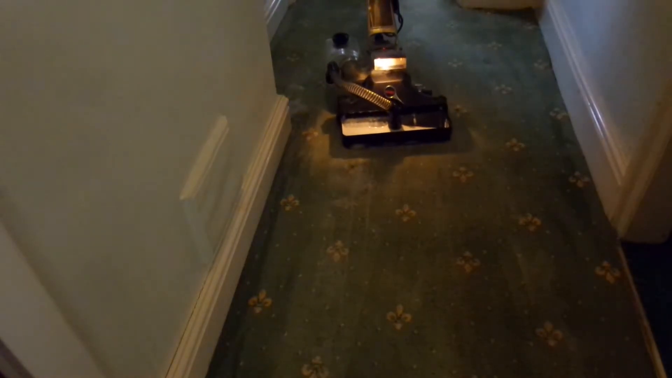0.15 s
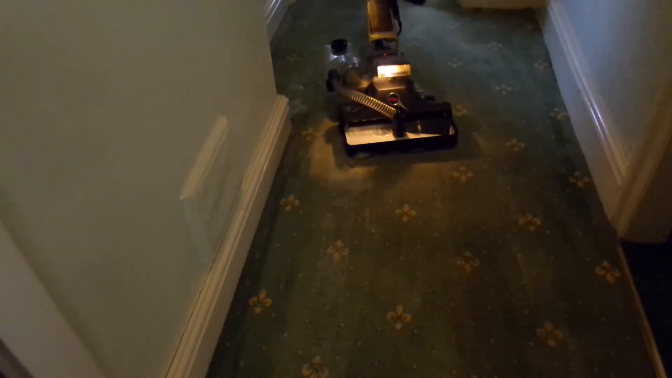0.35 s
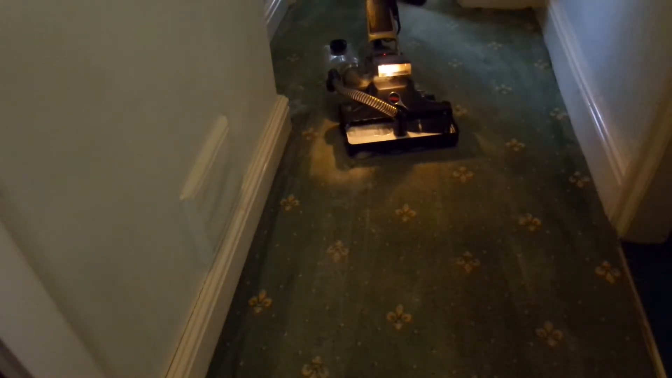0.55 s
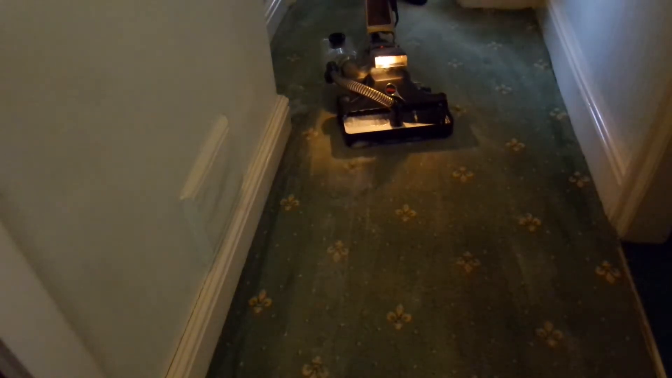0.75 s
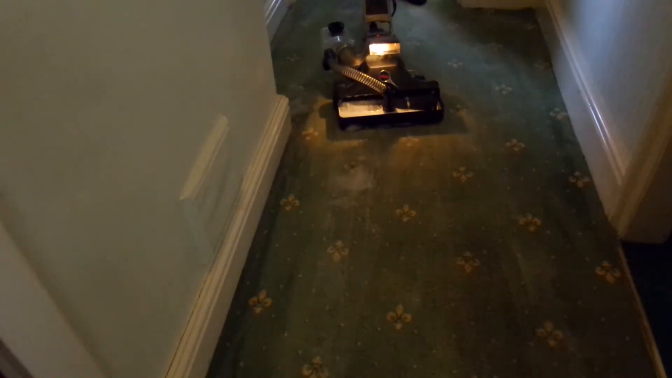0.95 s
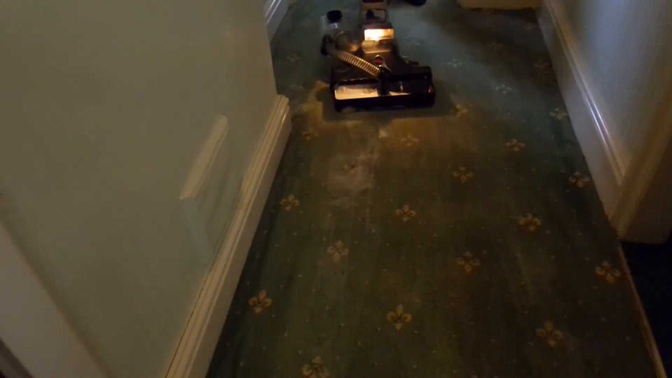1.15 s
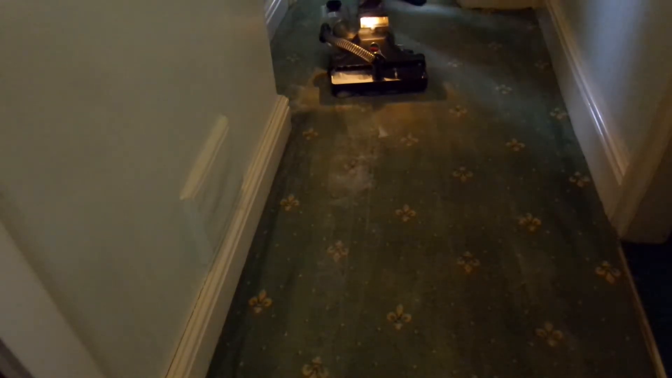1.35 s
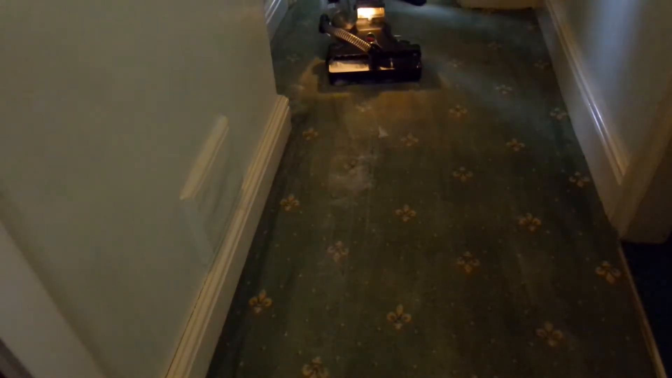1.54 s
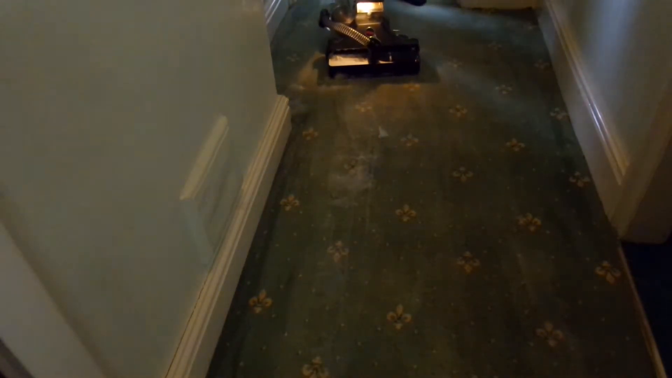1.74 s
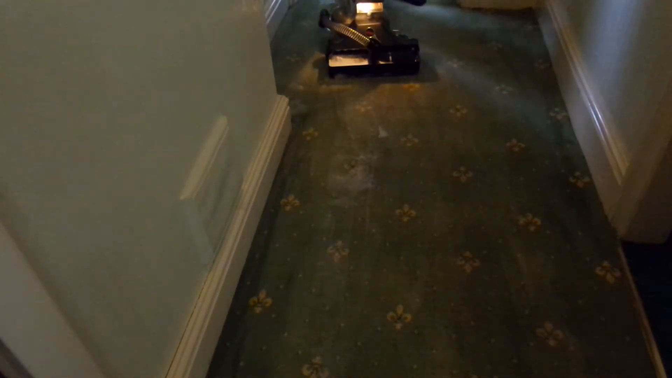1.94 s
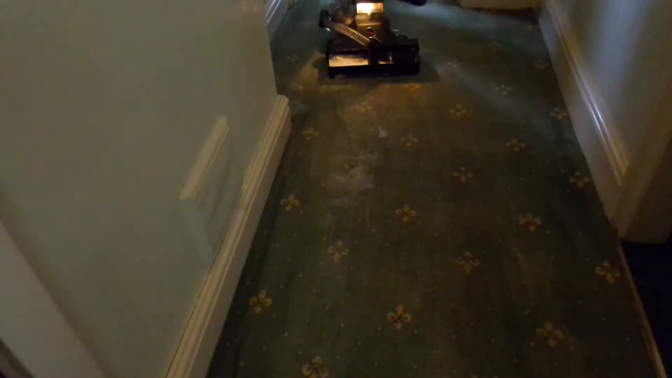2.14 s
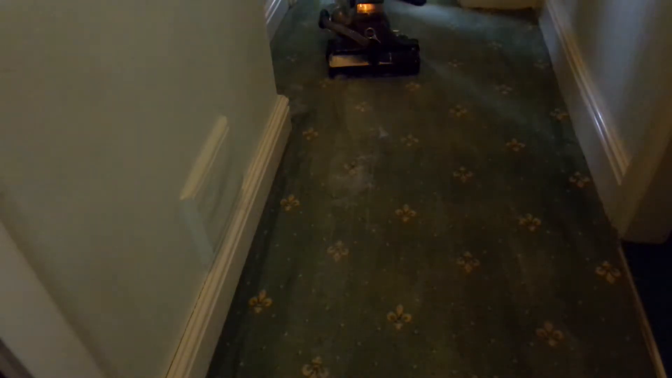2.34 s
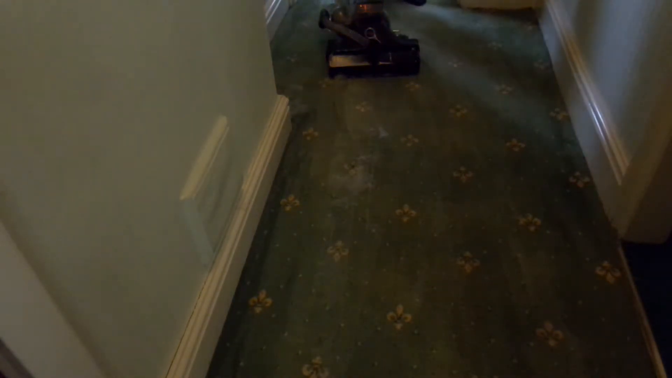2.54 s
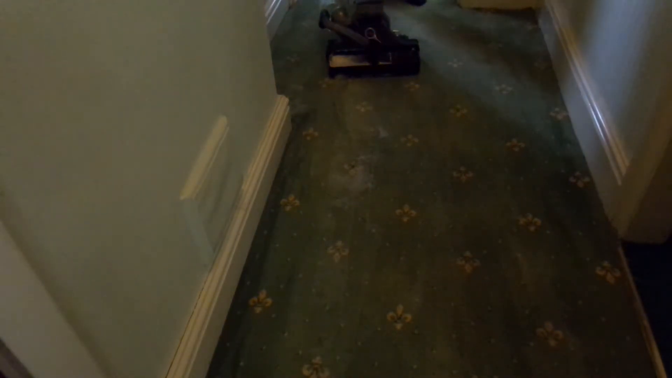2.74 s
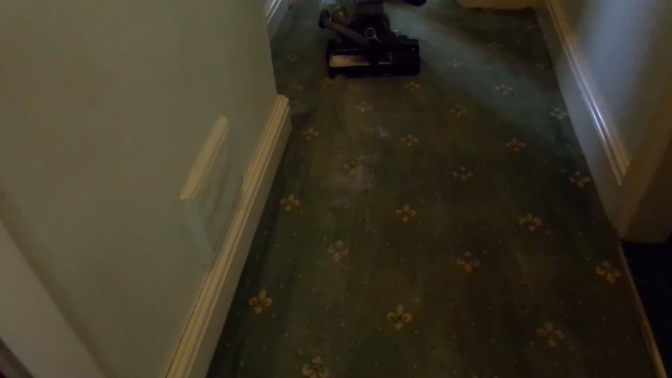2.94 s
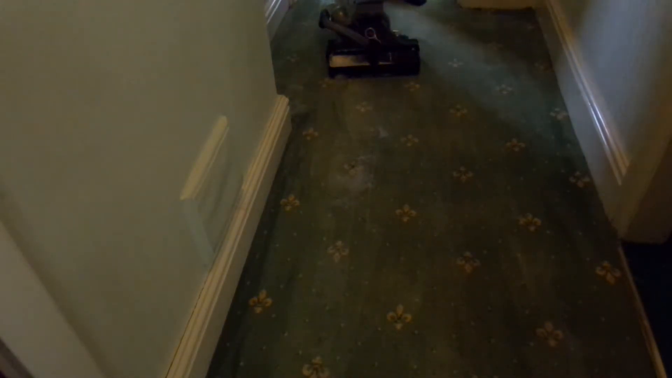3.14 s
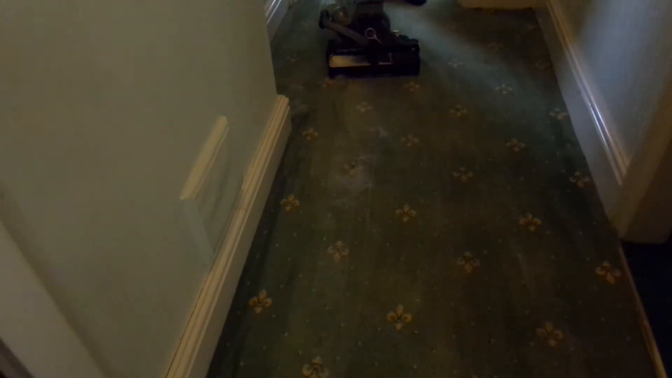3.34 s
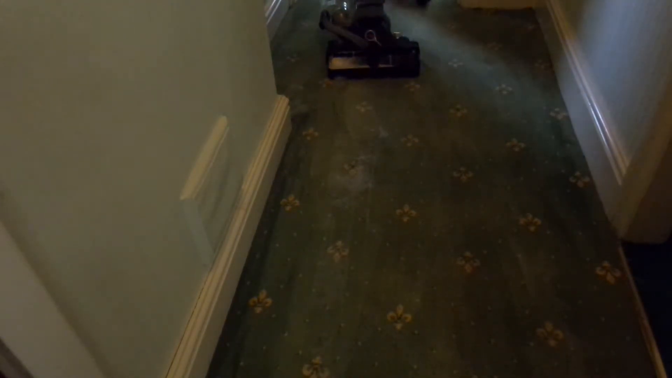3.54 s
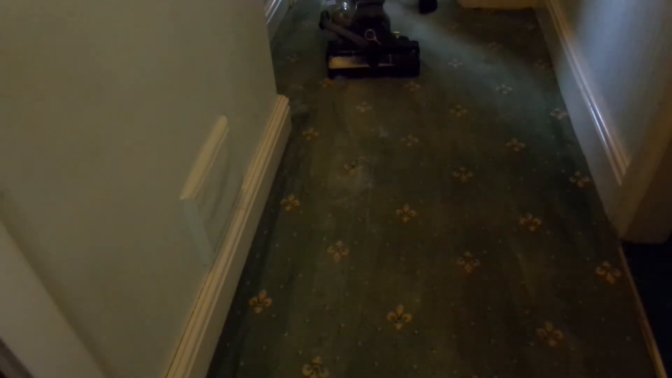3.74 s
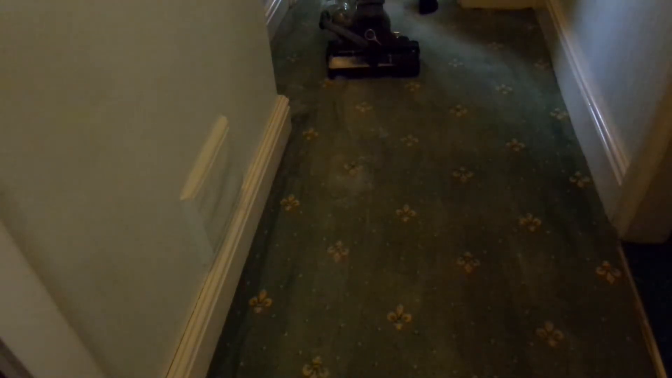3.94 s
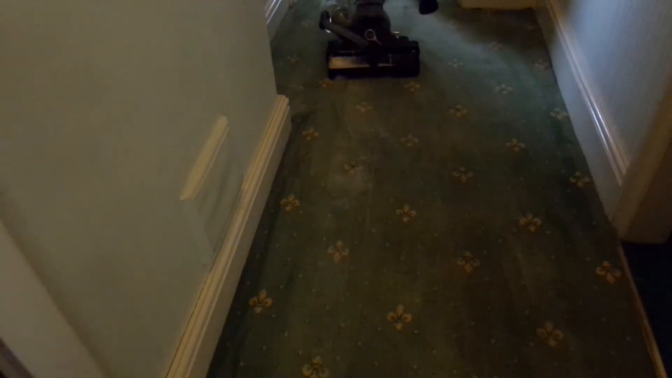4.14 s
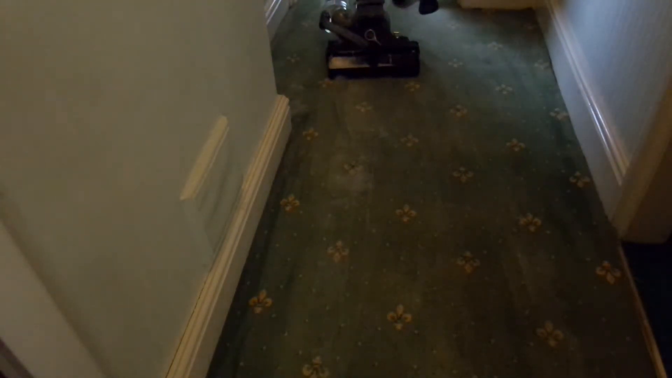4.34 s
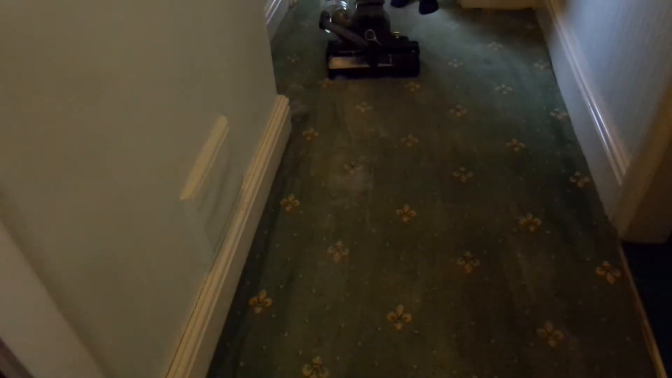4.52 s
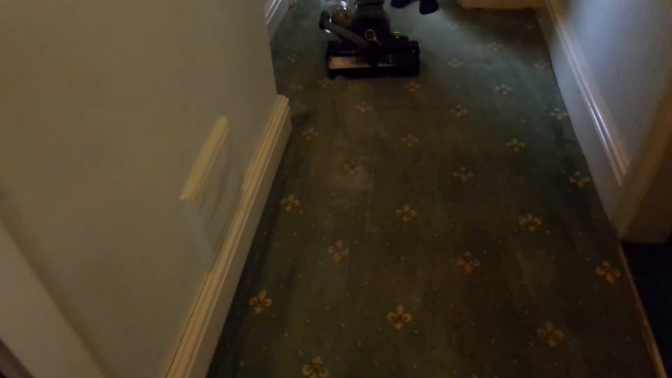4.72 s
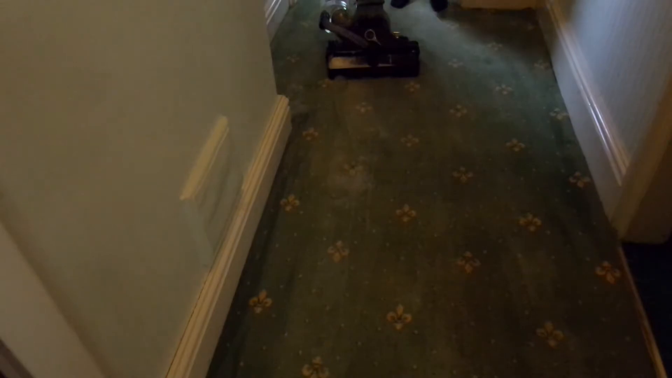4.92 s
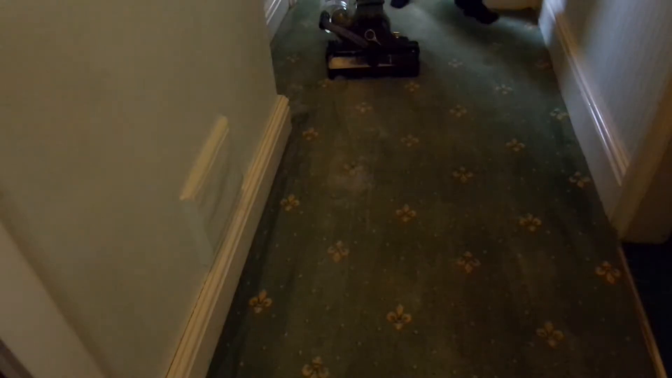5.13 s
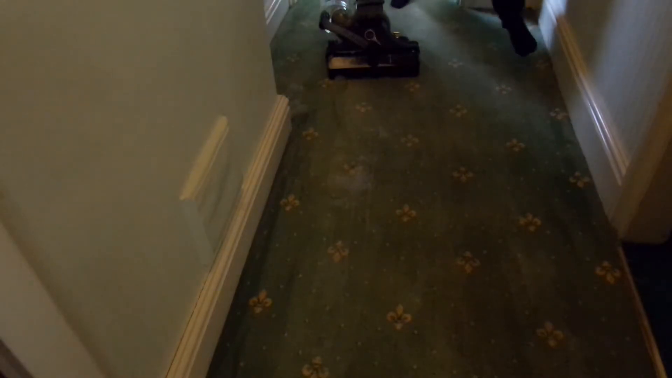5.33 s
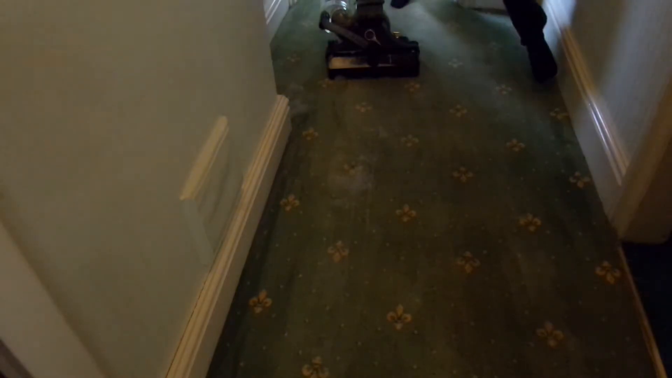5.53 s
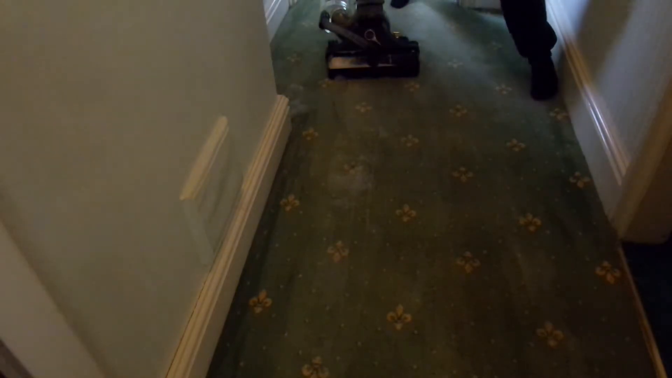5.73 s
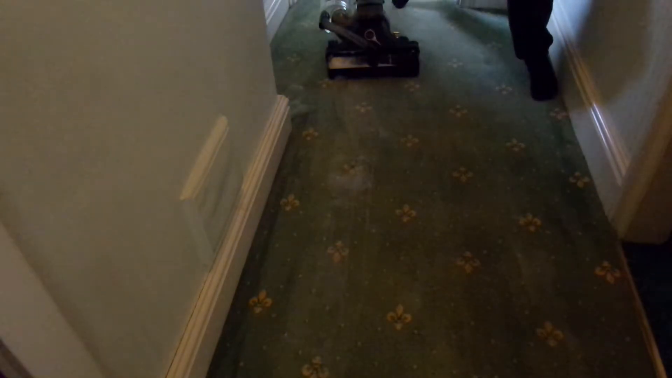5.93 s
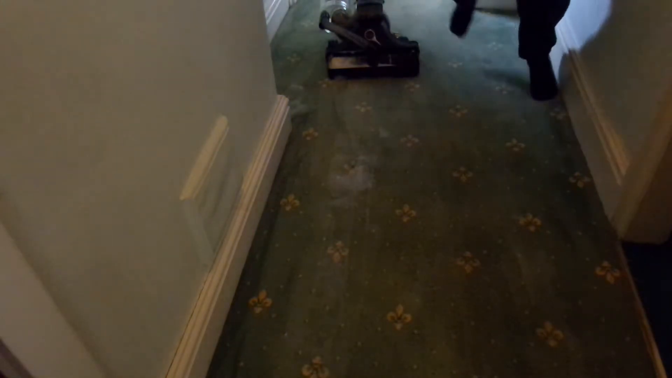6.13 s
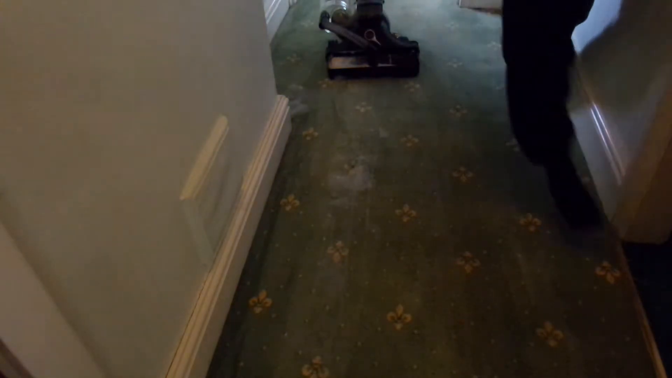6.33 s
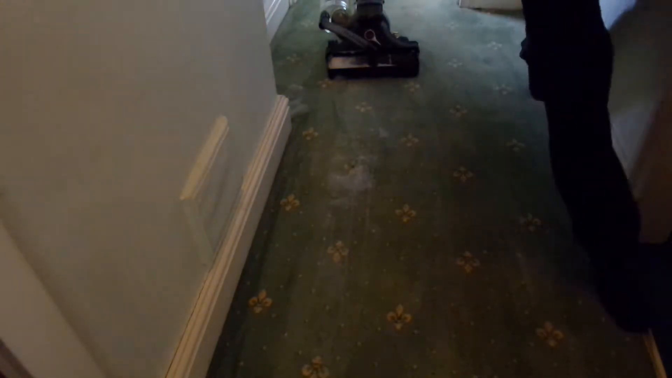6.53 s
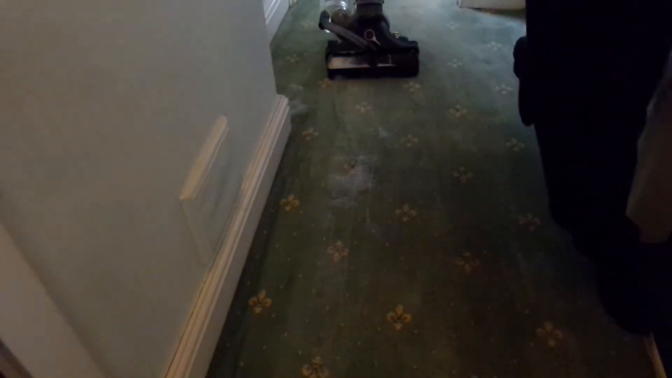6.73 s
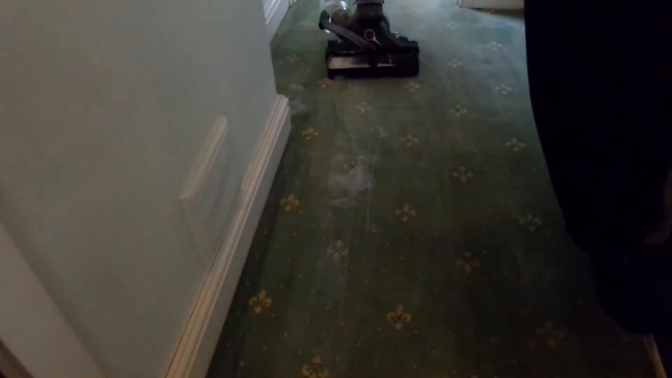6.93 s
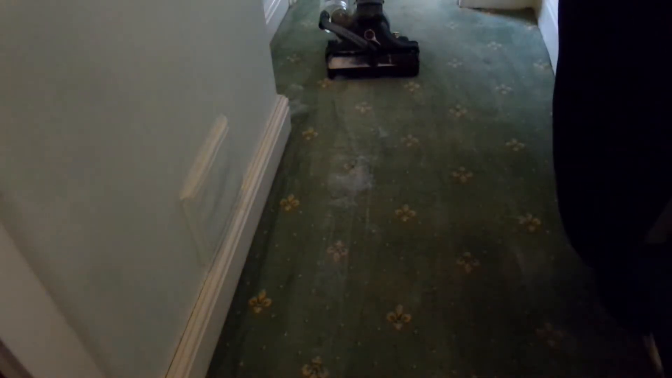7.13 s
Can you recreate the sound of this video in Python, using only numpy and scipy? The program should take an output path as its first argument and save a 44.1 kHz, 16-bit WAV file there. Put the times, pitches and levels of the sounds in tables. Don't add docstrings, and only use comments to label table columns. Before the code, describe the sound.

An upright vacuum cleaner roars and whines in a carpeted corridor, switches off and spins down, then plastic creaks, clacks and footsteps follow.

```python
import sys
import numpy as np
from scipy import signal
from scipy.io import wavfile

SR = 44100
rng = np.random.default_rng(int(sys.argv[2]) if len(sys.argv) > 2 else 0)


def transcribe(u):
    v = np.clip(np.atleast_2d(u).T, -1, 1)
    q = np.round(v * 32767).astype(np.int16)
    wavfile.write(sys.argv[1], SR, q)


def level_to_linear(level):
    exponent = np.asarray(level, float) / 20
    return 10 ** exponent


N = 320607
SWITCH_OFF_S = 2.23

# start in seconds, peak in dB, boom in dB, slap in dB, board pitch in Hz.
FOOT_BLOWS = [(3.938, -49, -14, -1, 528), (4.394, -41.5, -32, -16, 240), (4.456, -53, -12, -19, 237),
              (4.509, -61.5, -8, -20, 271), (4.599, -69.5, 16.5, -16, 215), (4.639, -75, -3, -13, 191),
              (4.733, -28.5, -5, -23, 383), (4.742, -31.5, -4, -6, 419), (4.89, -41.5, -1, -23, 190.2),
              (4.929, -43, -19, -15, 208), (5.88, -56.5, -18, -13, 307), (5.94, -52, -24, -28, 248),
              (5.988, -60, -4, -17, 191), (6.039, -65, -15, -12, 223), (6.189, -56.5, -15, -16, 191),
              (6.535, -36, -4, -30, 246), (6.5401, -27, -5, 0.5, 330), (6.544, -32, -7, -13, 294),
              (6.564, -33.5, -13, -16, 240), (6.598, -46, -14, -3, 196), (6.639, -45.5, -2, -3, 254),
              (6.781, -48.5, -19, -35, 190), (6.829, -48, -8, -20.5, 190), (6.899, -53.5, -1.5, -25, 192)]


def rms_one(x):
    return x / np.sqrt(np.mean(x ** 2) + 1e-20)


def in_time(rows, outside=None):
    s, *columns = np.transpose(rows)
    return [np.interp(np.arange(N) / SR, s, column, outside, outside) for column in columns]


def at_hz(points, hz):
    point_hz, value = np.array(points)[:, 0], np.array(points)[:, 1]
    return np.interp(np.log(hz), np.log(np.maximum(point_hz, 1)), value)


def drift(rate):
    r = np.exp(-80 * np.pi * rate / SR)
    settle = 2000
    slow = signal.lfilter([1], [1, -2 * r, r * r], rng.standard_normal(N // 40 + settle + 2))[settle:]
    return np.interp(np.arange(N) / 40, np.arange(len(slow)), rms_one(slow))


def band(x, low_hz, high_hz):
    sos = signal.butter(2, [low_hz, min(high_hz, .45 * SR)], "band", fs=SR, output="sos")
    return signal.sosfilt(sos, x)


def resonance(x, hz, width_hz):
    r = np.exp(-np.pi * width_hz / SR)
    return signal.lfilter(np.array([1, 0, -1]) * (1 - r * r) / 2, [1, -2 * r * np.cos(2 * np.pi * hz / SR), r * r], x)


def hollow(x, peaks):
    modes = [(-1) ** k * level_to_linear(db) * resonance(x, hz, width) for k, (hz, width, db) in enumerate(peaks)]
    return rms_one(sum(modes))


def bending(x, hz, width_hz, from_s, until_s):
    r, out, state = np.exp(-np.pi * width_hz / SR), np.zeros(N), np.zeros(2)
    for i in range(int(from_s * SR), int(until_s * SR), 128):
        poles = [1, -2 * r * np.cos(2 * np.pi * hz[i] / SR), r * r]
        out[i:i + 128], state = signal.lfilter([1, 0, -1], poles, x[i:i + 128], zi=state)
    return out / np.sqrt(np.mean(out[out != 0] ** 2))


def bursts(s, peak_db, t60):
    hits = np.full(N, 1e-18)
    hits[(s * SR).astype(int)] = level_to_linear(peak_db)
    return signal.lfilter([1], [1, -level_to_linear(-60 / (t60 * SR))], hits)


def spells(start_s, length_s, level_db, rise_db_per_s, fall_db_per_s):
    t, out = np.arange(N) / SR, np.full(N, 1e-9)
    for s, length, db in zip(start_s, length_s, level_db):
        first = max(int((s - 60 / rise_db_per_s) * SR), 0)
        near = slice(first, int((s + length + 60 / fall_db_per_s) * SR))
        before_db = np.maximum(rise_db_per_s * (s - t[near]), 0)
        after_db = np.maximum(fall_db_per_s * (t[near] - s - length), 0)
        out[near] += level_to_linear(db - before_db - after_db)
    return out


def strike(events, levels_db, modes, scatter_db):
    at, out = (np.array(events)[:, 0] * SR).astype(int), 0
    luck = rng.standard_normal((len(at), len(modes)))
    for k, (hz, mode_db, t60) in enumerate(modes):
        blow_db = levels_db[:, k % levels_db.shape[1]] + mode_db + scatter_db * luck[:, k]
        clicks = np.full(N, 1e-18)
        clicks[at] = level_to_linear(blow_db) * np.sign(luck[:, k - 1])
        r, w = level_to_linear(-60 / (t60 * SR)), 2 * np.pi * hz / SR
        out = out + signal.lfilter([0, np.sin(w)], [1, -2 * r * np.cos(w), r * r], clicks)
    return out


def diffuse(gain_db, size, lean=1, count=3):
    # frequency in Hz, left-right likeness.
    likeness = [(30, .85), (60, 0.94), (130, 1), (290, 0.93), (640, 0.75), (1410, 0.18), (3100, 0.2),
                (6820, 0.05), (15000, 0.03)]
    # frequency in Hz, left minus right in dB.
    left_lean = [(60, -1.5), (180, 0), (550, 0), (1650, 3), (4970, 7.5), (15000, 6.5)]
    edges = 24 * 2 ** np.arange(0, 9.7, 1 / count)
    out, white = 0, rng.standard_normal((2, 2, size))
    for k, (low, high) in enumerate(zip(edges, edges[1:])):
        mid, side = band(white[k % 2], low, high)
        hz = np.sqrt(low * high)
        alike = np.clip(at_hz(likeness, hz), -1, 1)
        pan = level_to_linear(lean * at_hz(left_lean, hz) / 2 * np.array([[1], [-1]]))
        stereo = np.sqrt(1 + alike) * mid + np.sqrt(1 - alike) * side * [[1], [-1]]
        out = out + pan * level_to_linear(gain_db(hz)) * stereo
    return out


def corridor(x, wet_db, lean, same=False):
    # frequency in Hz, t60 in seconds.
    decay = [(100, 0.3), (500, 0.22), (2000, 0.24), (8000, 0.056)]
    t = np.arange(SR // 2) / SR
    tail = diffuse(lambda hz: -60 * t / at_hz(decay, hz), size=len(t), lean=lean, count=2)
    tail = tail * np.minimum(t / 0.0014, 1)
    tail = level_to_linear(wet_db) * tail / np.sqrt(np.sum(tail ** 2) / 2)
    tail[:, 0] += 1
    return signal.oaconvolve(np.atleast_2d(x), tail[:1] if same else tail, axes=1)[:, :N]


def quiet_house():
    # frequency in Hz, level in dB.
    murmur = [(15, -30), (25, -0.5), (44, -6), (157, -4), (228, -7), (527, -19), (749, -31.5),
              (2090, -17.5), (2460, -26), (3990, -25), (4450, -32), (5090, -30), (8490, -31.5),
              (15800, -29.5)]
    hiss_hz, hiss_width_hz, hiss_db = 15300, 500, 8
    flicker = drift(10)
    level_db = lambda hz: at_hz(murmur, hz) + 0.7 * (hz > 11000) * flicker
    floor = level_to_linear(-66.5) * rms_one(diffuse(level_db, size=N, lean=0.18, count=2))
    hiss = resonance(resonance(floor, hiss_hz, hiss_width_hz), hiss_hz, hiss_width_hz)
    return floor + level_to_linear(hiss_db) * hiss


def soles():
    # low edge in Hz, high edge in Hz, level in dB over the slap, t60 in seconds.
    wash = [(500, 1500, -18.5, 0.21), (1500, 4000, -26.5, 0.16), (4000, 11000, -35, .06)]
    s, peak, boom, slap, pitch_hz = np.transpose(FOOT_BLOWS)
    out = 0
    for low, high, level_db, t60 in wash:
        noise = rms_one(band(rng.standard_normal((2, N)), low, high))
        out = out + noise * bursts(s, peak + slap + level_db, t60)
    return out


def shuffle():
    # start in seconds, length in seconds, shuffle in dB, rustle in dB.
    moves = [(4.128, 0.029, -68, -70), (4.397, 0.1, -81, -77), (4.78, 0.045, -54.5, -69),
             (4.906, 0.059, -72, -67.5), (5.9, .15, -71, -80), (6.065, 0.034, -70, -65),
             (6.547, .01, -72, -68), (6.59, 0.021, -51, -67), (6.718, 0.25, -74.5, -68.5),
             (7.198, 0.067, -80.5, -74.5)]
    # start in seconds, length in seconds, rumble in dB.
    settling = [
        (2.748, 0.16, -45.5),
        (3.025, 0.017, -43),
        (3.194, 0.16, -51.5),
        (3.387, 0.2, -56),
        (3.95, 0.017, -54),
    ]
    rise_db_per_s, fall_db_per_s, rustle_db_per_s = 260, 181, 114
    s, length, rumble_db, rustle_db = np.transpose(moves)
    weight = spells(s, length, rumble_db, rise_db_per_s, fall_db_per_s)
    rumble = rms_one(band(rng.standard_normal(N), 90, 480)) * weight * level_to_linear(2.9 * drift(15))
    roll = rms_one(band(rng.standard_normal(N), 90, 260))
    roll = roll * spells(*np.transpose(settling), rise_db_per_s, fall_db_per_s)
    rustle = spells(s, length, rustle_db - 7.0, rustle_db_per_s, rustle_db_per_s)
    cloth = rms_one(band(rng.standard_normal((2, N)), 1400, 12000)) * rustle * level_to_linear(2.03 * drift(40))
    return rumble + roll + cloth


def feet():
    # frequency in Hz, level in dB, t60 in seconds.
    boards = [(123.7, 8.5, 0.087), (156, -6, 0.12), (190.7, 6, 0.072), (241, 5, 0.1), (296, -3.5, 0.14),
              (348.6, 1.5, 0.11), (445, 8.5, 0.023), (437, -0.5, 0.071), (542, 2.5, 0.075),
              (561.4, -1, 0.091), (726, 12.5, 0.0057), (720, 5, 0.028), (920, -7.5, 0.086),
              (1040, 7, 0.021), (1100, -20, 0.068), (1280, -5.5, 0.071), (1690, -9.5, 0.05)]
    s, peak, boom, slap, pitch_hz = np.array(FOOT_BLOWS).T[:, :, None]
    hz = np.array(boards)[:, 0]
    low, high = hz < 190, hz > 610
    aim_db = -14 * np.abs(np.log2(hz / pitch_hz)) * ~low * ~high
    knock = strike(FOOT_BLOWS, peak - 8 + aim_db + low * boom + high * (slap - 3), boards, scatter_db=3.0)
    crack = signal.lfilter([1], [1, -1.76, .775], rng.standard_normal(N))
    crack = rms_one(band(crack, 460, 5500))
    return band(knock, 73, 2100) + bursts(s[:, 0], (peak + slap)[:, 0] - 17, 0.055) * crack


def ticks():
    # start in seconds, peak in dB, brightness in dB per octave.
    clicks = [(6.4013, -50.5, 0), (6.4335, -56, -2), (6.4686, -51, 0), (6.4999, -60, 0), (6.5357, -51, 3),
              (6.5402, -45, 4), (6.6026, -46.5, 4), (6.634, -56, 0), (6.653, -65, 9), (6.6695, -46, -2),
              (6.7487, -50, -6), (6.760, -46, 0), (6.7785, -53, -1), (6.7985, -49, -1), (6.952, -49, 0),
              (7.098, -51.5, -1.5)]
    # frequency in Hz, level in dB, t60 in seconds.
    plug_modes = [(2053, -9, 0.012), (3860, -3, 0.006), (4700, -1, 0.0086), (5300, -3, 0.0066),
                  (6760, -7, 0.0045), (7700, -11, 0.0036), (9000, -16, .003), (10300, -17, .004)]
    s, peak, bright = np.array(clicks).T[:, :, None]
    octaves = np.log2(np.array(plug_modes)[:, 0] / 4700)
    click = band(strike(clicks, peak - 6.5 + bright * octaves, plug_modes, scatter_db=1.5), 1600, 12000)
    left_over_right_db = 17.5
    return click * level_to_linear(np.array([[.5], [-.5]]) * left_over_right_db)


def pings():
    # start in seconds, peak in dB, pitch in Hz, swell in seconds, glide in share per second.
    rings = [(3.3255, -35, 1170, .0015, 0), (3.35, -41, 1330, .004, -4), (3.404, -35, 1500, .005, 8),
             (3.69, -51, 1100, 0.0036, 0), (3.384, -33, 1070, 0.0026, 0), (3.437, -31, 1056, 0.0023, 6),
             (3.446, -36, 1060, .003, 1), (3.453, -35, 1050, .003, 3), (3.463, -35, 1050, .003, -4),
             (3.497, -45, 2700, .005, 2), (3.51, -49, 2480, .006, 3), (3.507, -49, 1110, 0.0036, 0),
             (3.541, -25, 1065, 0.0029, 4), (3.555, -28, 1058, 0.0029, 0), (3.567, -35, 1073, 0.0049, -1.5),
             (3.606, -38, 1090, 0.0035, 1), (3.841, -56, 2200, 0.0048, -8.5), (3.865, -57, 850, .007, 3),
             (3.88, -58, 1030, 0.0065, -2), (3.939, -47, 1100, 0.0043, -1), (3.956, -44, 1080, .005, 2),
             (3.962, -44, 1450, .005, -1), (3.973, -46, 1060, 0.0053, 3), (3.98, -46, 1390, .005, -2),
             (3.994, -48, 1550, 0.0044, -3), (4.025, -50, 1400, .006, 1), (3.991, -46, 1070, 0.0091, -2),
             (4.015, -46, 1065, 0.0088, -1), (4.036, -52, 1067, 0.0051, -2), (4.09, -59, 1070, .004, 2),
             (4.104, -55, 900, 0.006, 1), (4.112, -51, 1120, 0.006, 3), (4.125, -58, 1050, .006, -2),
             (4.15, -63, 1100, .006, 3), (4.7315, -33, 252, .002, 2), (4.738, -28, 400, 0.0048, 0),
             (4.74, -25, 139, 0.012, -4), (4.889, -49, 129, 0.014, 3), (6.561, -34, 200, 0.0044, 2)]
    # start in seconds, length in seconds, level in dB.
    squeals = [
        (3.405, 0.019, -49),
        (3.51, 0.03, -52),
        (3.55, 0.023, -46),
        (3.597, .012, -60),
        (3.632, .012, -66),
    ]
    squeal_hz, squeal_width_hz = 1850, 31
    out, t = np.zeros(N), np.arange(SR // 8) / SR
    for s, peak_db, hz, swell_s, glide in rings:
        u = t / max(swell_s, .001)
        tone = np.sin(2 * np.pi * hz * t * (1 + glide * t / 2))
        out[int(s * SR):int(s * SR) + len(t)] += level_to_linear(peak_db) * u * np.exp(1 - u) * tone
    squeal = resonance(rng.standard_normal(N), squeal_hz, squeal_width_hz)
    squeal = rms_one(resonance(squeal, squeal_hz, 3 * squeal_width_hz))
    squeal = squeal * spells(*np.transpose(squeals), 500, 260)
    return (out + squeal) * level_to_linear(np.array([[-.3], [.3]]))


def handle():
    # start in seconds, length in seconds, ring in dB, grind over ring in dB, ring pitch in Hz.
    strokes = [(3.34, .012, -47, -10, 1170), (3.344, 0.047, -41, -3.5, 1170),
               (3.387, 0.012, -40, 2.5, 1020), (3.425, .045, -42, -18, 1060),
               (3.516, 0.03, -39.5, -12, 1100), (3.562, 0.02, -45, -22, 1070), (3.568, 0.069, -54, 0, 1075),
               (3.671, 0.035, -62, 8.5, 1100), (3.842, .015, -72, 4, 1210), (3.862, 0.032, -56, -8, 1040),
               (3.951, 0.02, -43.5, 0, 1050), (3.983, 0.056, -54, 1, 1070), (4.089, 0.039, -59, -2.5, 1055),
               (4.29, 0.051, -69.5, -4, 950), (4.378, .03, -85, -3, 1024), (4.45, 0.024, -87, 18, 1090)]
    # start in seconds, peak in dB, snap in dB, ring in dB.
    latch = [(3.325, -37, -17, -4), (3.349, -26, -11, -5), (3.396, -37, -9, -20), (3.439, -17.5, -42, -9),
             (3.498, -20, -38, -30), (3.543, -21, -37, -11), (3.558, -21, -47, -18), (3.609, -34, -19, -18),
             (3.692, -40, -9, -20), (3.843, -47, -20, -21), (3.939, -34, -14, 2), (3.9449, -39, -20, 2)]
    # frequency in Hz, level in dB, t60 in seconds.
    shell = [(1040, -16, 0.029), (1050, -8, 0.029), (1830, -20.5, .04)]
    # frequency in Hz, width in Hz, level in dB.
    low_modes = [(530, 56, -6), (790, 39, -3.5)]
    # frequency in Hz, width in Hz, level in dB.
    upper_modes = [(1840, 98, 10), (2320, 160, 3), (2600, 48, -26)]

    slips = (rng.random(N) < 1800 / SR) * level_to_linear(2.8 * np.minimum(rng.exponential(1, N), 4))
    slips = slips * rng.choice([-1, 1], N)
    jerk_count = np.floor(np.cumsum(110 * level_to_linear(2.7 * drift(25))) / SR)
    jerks = np.diff(jerk_count, prepend=0) * level_to_linear(4.7 * rng.standard_normal(N))

    start, length, ring_db, grind_db, pitch = np.transpose(strokes)
    (pitch_hz,) = in_time(np.transpose([start + length / 2, pitch]))
    drive = band(rms_one(jerks) + 0.41 * rms_one(slips), 350, 1900)
    body = bending(drive, pitch_hz, width_hz=75, from_s=start[0] - .1, until_s=start[-1] + .2)
    body = body + 0.56 * hollow(drive, low_modes)
    upper = hollow(slips[::-1], upper_modes)
    grind = rms_one(band(band(slips, 380, 2020), 360, 2500))
    scratch = signal.lfilter([1], [1, -.9], np.roll(slips, 999))
    scratch = rms_one(band(scratch, 2000, 13000))

    push = lambda over_db: spells(start, length, ring_db - 8.0 + over_db, 1202, 417)
    rub = push(0) * (body + level_to_linear(-8) * upper)
    rub = rub + push(grind_db) * grind + push(grind_db - 5.5) * scratch

    s, peak, snap, ring = np.transpose(latch)
    struck = band(strike(latch, (peak + ring)[:, None] + 1.5, shell, scatter_db=0.5), 400, 2100)
    struck = struck + bursts(s, peak - 16, 0.05) * grind
    struck = struck + bursts(s, peak + ring - 12, 0.03) * body
    return rub + struck + bursts(s, peak + snap - 11, 0.042) * scratch


def strengths(steady, sings, free_s):
    sing_db_per_s, fade_db_per_s = 150, 110
    s, until, which, db = np.transpose(sings)
    flutter = level_to_linear(2.5 * (free_s > 0) * drift(16))
    gains = []
    for k, level_db in steady:
        own = which == round(k)
        singing = spells(s[own], (until - s)[own], db[own], sing_db_per_s, sing_db_per_s)
        gains.append((round(k), flutter * (level_to_linear(level_db - fade_db_per_s * free_s) + singing)))
    return gains


def orders(hz, gains, wobble_db):
    tones_end_s, hum_flutter_db = 3.05, 6.5
    coasting = np.clip(1 - hz / (0.99 * hz[0]), 0, 1)
    unsteady_hz = hz * (1 + .0004 * drift(7.5) + 0.035 * coasting * drift(47))
    turn, out = 2 * np.pi * np.cumsum(unsteady_hz) / SR, 0
    for order, gain in gains:
        part = 0.11 * min(order, 6) * (drift(0.75) / 2 + rng.uniform(0.22, 1.0))
        side = np.array([[1], [-1]]) * part
        waver = level_to_linear(3.5 + wobble_db * drift(3.0) + hum_flutter_db / order * drift(20))
        out = out + gain * waver * np.sin(order * turn + side + rng.uniform(0, 2 * np.pi))
    return out * np.clip((tones_end_s - np.arange(N) / SR) / 0.055, 0, 1)


def motor():
    # time in seconds, fan speed in Hz, brush drive speed in Hz.
    shafts = [(0, 204.4, 208.5), (.55, 204.4, 208.8), (.86, 206.2, 213.3), (1.24, 208.1, 212.7),
              (1.75, 207.1, 214.8), (2.21, 205.8, 214.8)]
    # order, level in dB.
    fan_orders = [(1, -38), (2, -29), (6, -40), (11, -48), (22, -63.5)]
    # order, level in dB.
    brush_orders = [(5, -43), (7, -53.5), (8, -49.5), (9, -56)]
    # start in seconds, end in seconds, order, level in dB.
    fan_sings = [(.02, .62, 2, -27), (.7, 1.08, 2, -23), (1.14, 1.4, 2, -30), (.08, .75, 6, -33),
                 (.3, 1.2, 6, -33), (.78, 1.27, 6, -33), (1.36, 1.56, 6, -40), (.1, .8, 11, -49),
                 (.03, .11, 22, -52), (.16, .22, 22, -49), (.27, .44, 22, -56), (.56, .79, 22, -50),
                 (.88, .92, 22, -54), (1.03, 1.11, 22, -52), (2.18, 2.24, 6, -39), (2.32, 2.39, 6, -39),
                 (2.45, 2.46, 6, -41), (2.51, 2.62, 6, -34), (2.7, 2.79, 6, -39), (2.87, 3.0, 6, -40)]
    # start in seconds, end in seconds, order, level in dB.
    brush_sings = [(.25, .5, 5, -40), (1.0, 1.35, 5, -35), (1.52, 1.77, 5, -36), (1.92, 2.22, 5, -35),
                   (.55, 1.5, 7, -38), (.3, .75, 8, -41), (1.02, 1.3, 8, -44), (2.25, 2.34, 8, -40),
                   (2.36, 2.37, 8, -42), (2.39, 2.41, 8, -45), (2.44, 2.5, 8, -44), (2.56, 2.61, 8, -44),
                   (.12, .4, 9, -47), (.87, .92, 9, -44), (1.0, 1.25, 9, -46), (1.85, 2.18, 9, -46)]
    fan_slows_per_s, brush_slows_per_s = 1.26, 1.09
    brush_leads_s = .024
    fan_hz, brush_hz = in_time(shafts)
    t = np.arange(N) / SR
    free_s = np.maximum(t - SWITCH_OFF_S, 0)
    loose_s = np.maximum(t - SWITCH_OFF_S + brush_leads_s, 0)
    fan_hz = fan_hz * np.exp(-fan_slows_per_s * free_s)
    brush_hz = brush_hz * np.exp(-brush_slows_per_s * loose_s)
    fan = orders(fan_hz, strengths(fan_orders, fan_sings, free_s), wobble_db=0.5)
    return fan + orders(brush_hz, strengths(brush_orders, brush_sings, free_s), wobble_db=2.0)


def air():
    # frequency in Hz, level in dB per Hz.
    rush_colour = [(15, -79), (25, -58.5), (141, -21), (414, -1), (473, -15), (542, -8.5), (749, -9),
                   (881, -12.5), (1150, -18.5), (1300, -18), (1590, -21.5), (2520, -31.5), (3300, -34),
                   (15800, -46)]
    # frequency in Hz, width in Hz, level in dB over the air.
    duct = [(99.9, 8.3, -1.5), (307, 56, -8.5), (412.5, 52, 0.5), (551, 27, 8), (871, 120, -1),
            (2193, 180, -0.5), (2581, 340, 2.5), (3920, 930, -7.5)]
    # time in seconds, level in dB.
    nearness = [(0, 0.5), (.8, -0.5), (1.3, -1), (2.21, -0.8)]
    # frequency in Hz, share of nearness, tilt in dB,
    # coasting loss in dB per s, further loss in dB per s squared.
    answers = [(330, 0.93, -1, 11, 19), (950, 0.55, 2, 25, 2), (1700, .4, -0.5, 26.5, -6.5),
               (2800, 0.27, 0, 22.5, -6), (7980, .2, 0, 13, 1), (15020, .1, 0.6, 13, 4)]
    # time in seconds, lag at the right port in samples.
    right_late = [(0, 7), (.9, 5), (1.6, 2.5), (3.5, 1.5)]
    fan_stops_s, stop_db_per_s, air_ends_s = 3.38, 45, 4.4
    t, (near_db,), together = np.arange(N) / SR, in_time(nearness), drift(3)
    free_s = np.maximum(t - SWITCH_OFF_S, 0)
    stop_db = stop_db_per_s * np.maximum(t - fan_stops_s, 0)
    size = int(air_ends_s * SR)
    tilt = spells([1.7], [0.25], [0], 150, 150)
    controls = np.array([near_db, tilt, -free_s, -free_s ** 2])

    def level_db(hz):
        shares = np.array([at_hz(np.array(answers)[:, [0, k]], hz) for k in (1, 2, 3, 4)])
        change = shares @ controls - stop_db
        return at_hz(rush_colour, hz) + (change + 0.35 * together + 0.76 * drift(27))[:size]

    rush = diffuse(level_db, size=size)
    rush = rush + sum(level_to_linear(gain_db) * resonance(rush, hz, width) for hz, width, gain_db in duct)
    rush = corridor(rush, wet_db=-11, lean=0, same=True)
    rush = np.pad(rush, ((0, 0), (0, N - rush.shape[1])))
    right = np.interp(np.arange(N) - in_time(right_late)[0], np.arange(N), rush[1])
    rush = np.array([rush[0], right])
    return level_to_linear(-15.0) * rush / np.sqrt(np.mean(rush[:, :2 * SR] ** 2))


def scene():
    background = quiet_house()
    steps_and_handle = level_to_linear(-1.0) * corridor(handle() + feet(), wet_db=2.0, lean=1.0)
    close = soles() + shuffle() + ticks() + pings()
    return background + steps_and_handle + close + motor() + air()


def band_limit(x):
    return signal.sosfilt(signal.butter(12, 16440, fs=SR, output="sos"), x)


def record(dry):
    port_hz, port_width_hz, port_db = 14000, 3100, -5.5
    x = dry + level_to_linear(port_db) * resonance(dry, port_hz, port_width_hz)
    x = signal.sosfilt(signal.butter(2, 35, "high", fs=SR, output="sos"), x)
    x = signal.sosfilt(signal.ellip(12, .3, 60, 15765, fs=SR, output="sos"), x)
    return band_limit(x)


dry = scene()
out = record(dry)
transcribe(out)
```